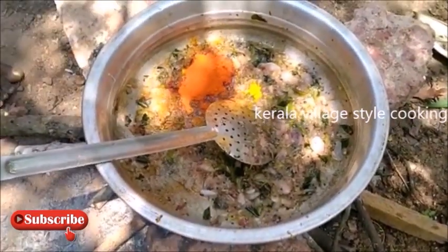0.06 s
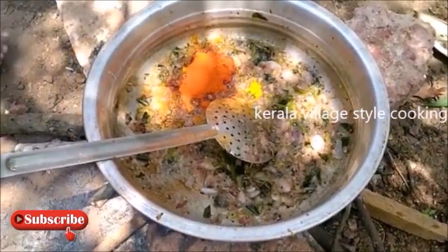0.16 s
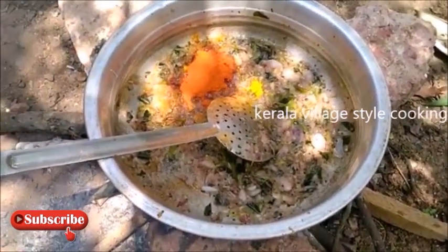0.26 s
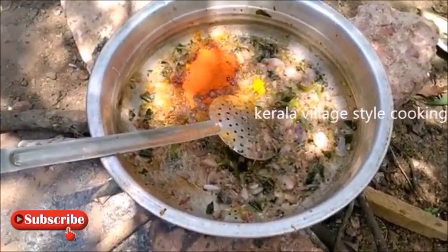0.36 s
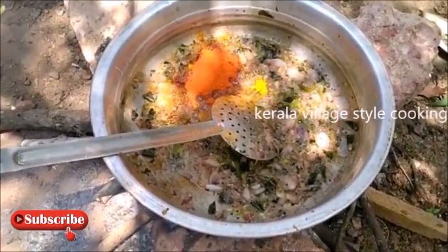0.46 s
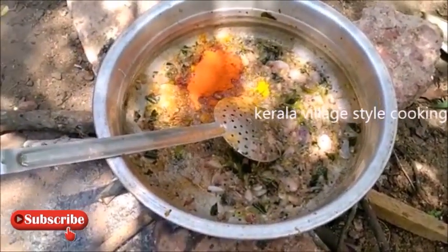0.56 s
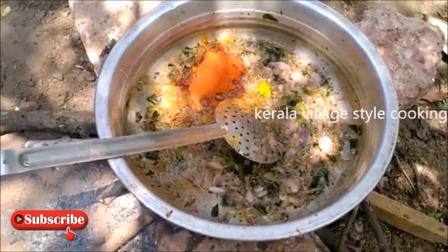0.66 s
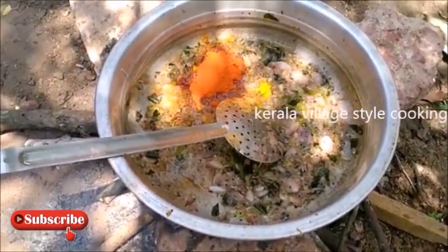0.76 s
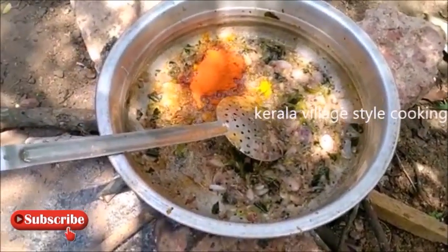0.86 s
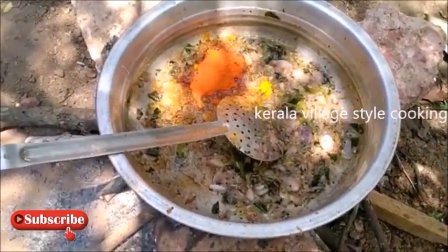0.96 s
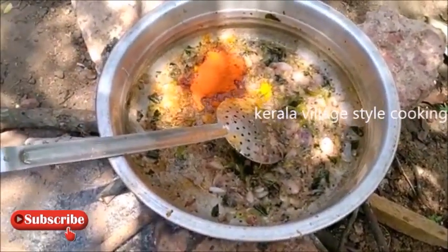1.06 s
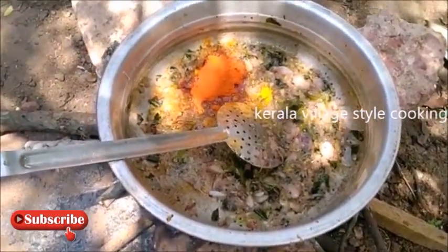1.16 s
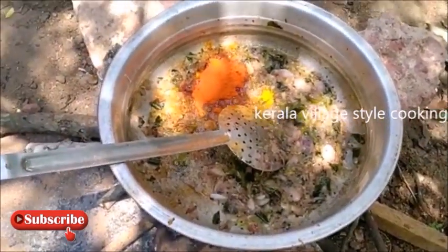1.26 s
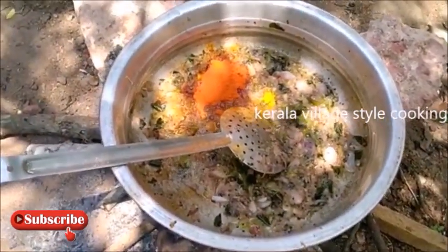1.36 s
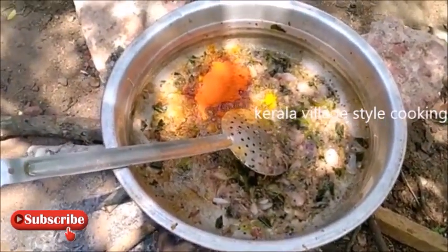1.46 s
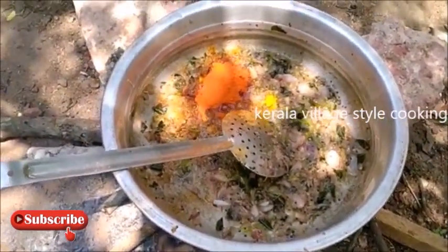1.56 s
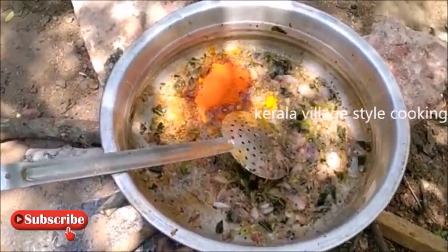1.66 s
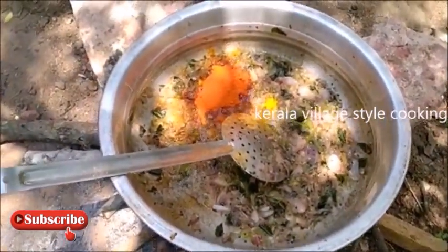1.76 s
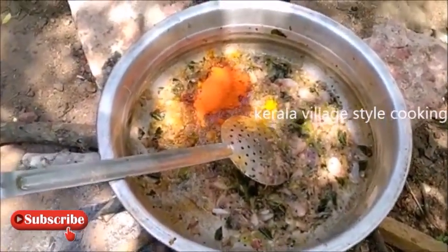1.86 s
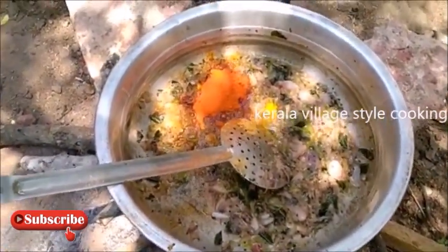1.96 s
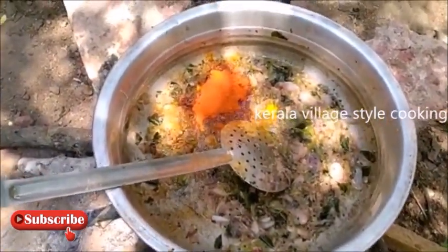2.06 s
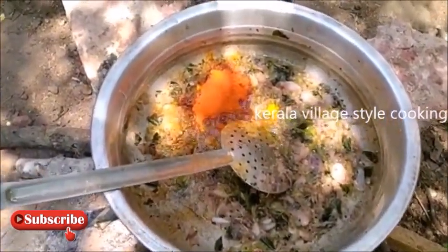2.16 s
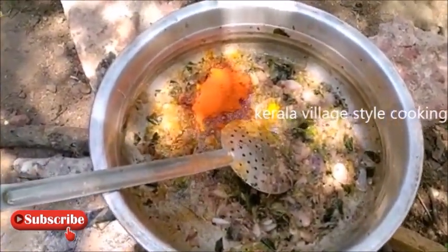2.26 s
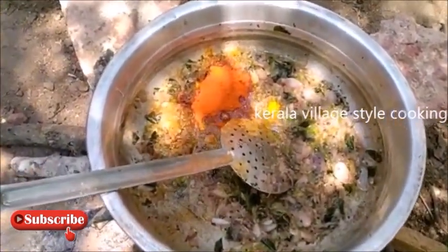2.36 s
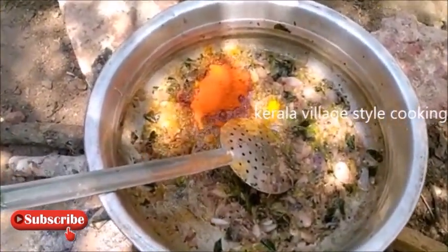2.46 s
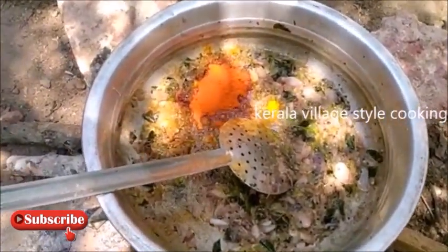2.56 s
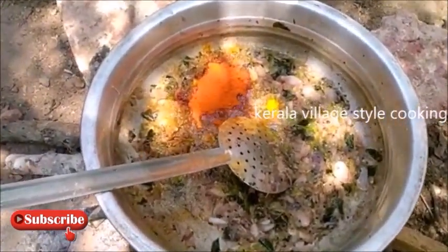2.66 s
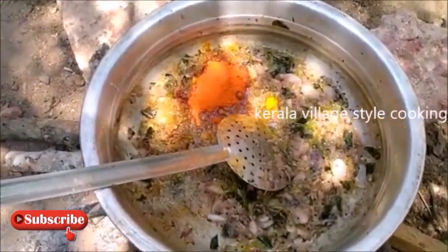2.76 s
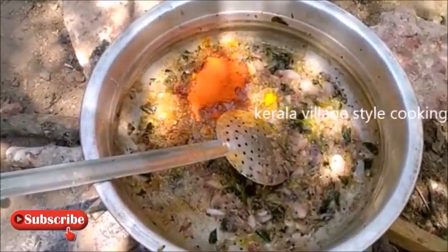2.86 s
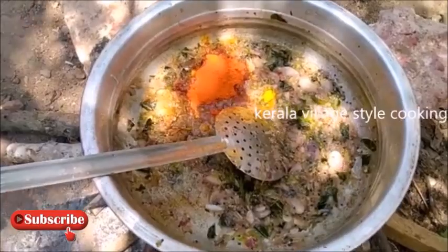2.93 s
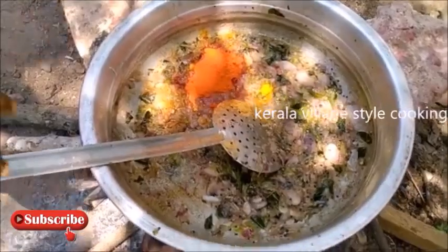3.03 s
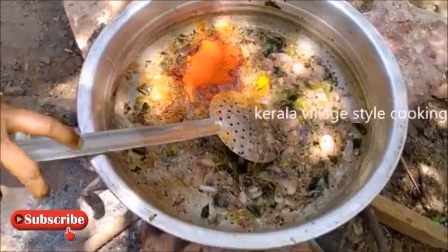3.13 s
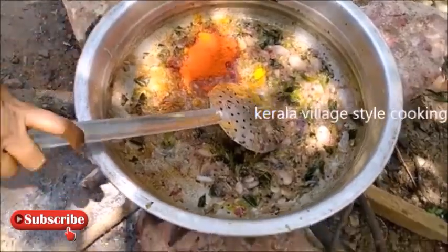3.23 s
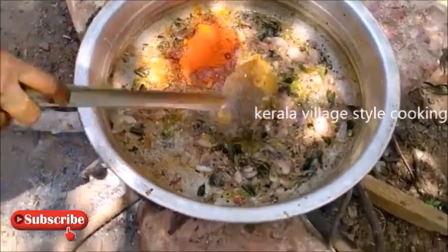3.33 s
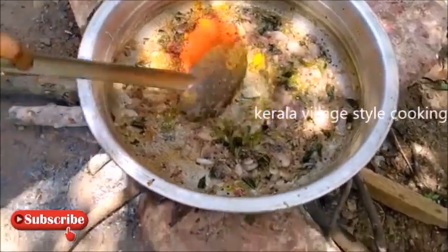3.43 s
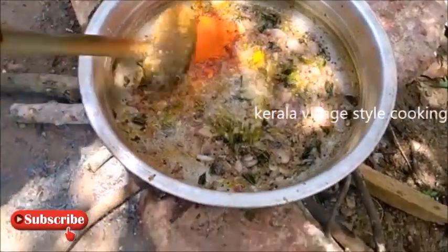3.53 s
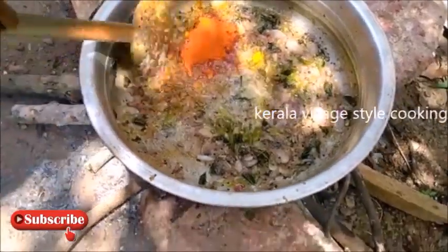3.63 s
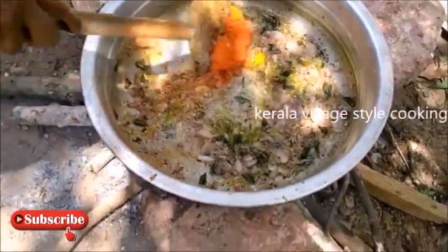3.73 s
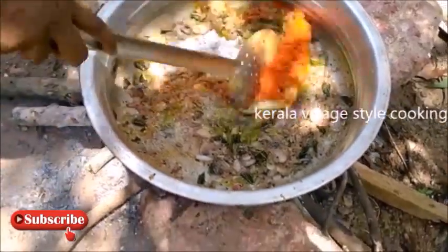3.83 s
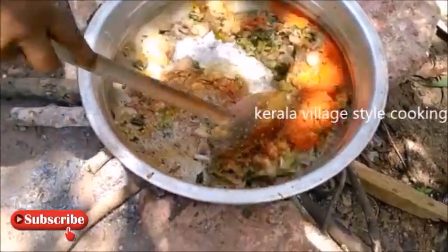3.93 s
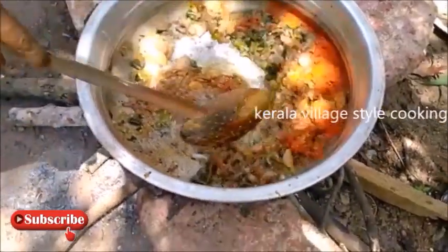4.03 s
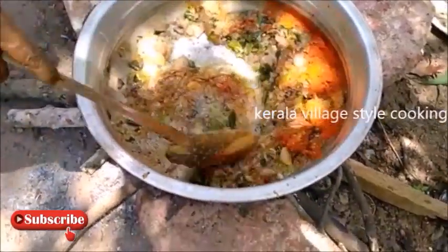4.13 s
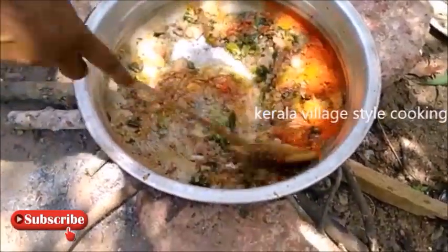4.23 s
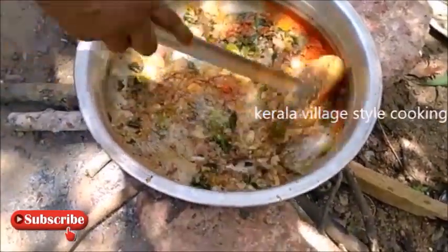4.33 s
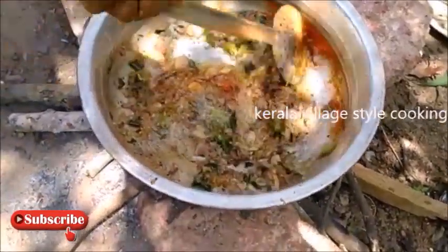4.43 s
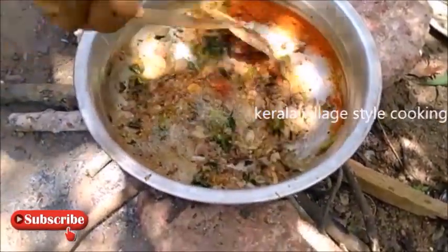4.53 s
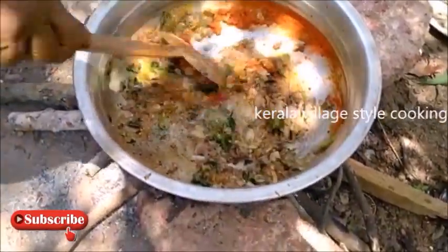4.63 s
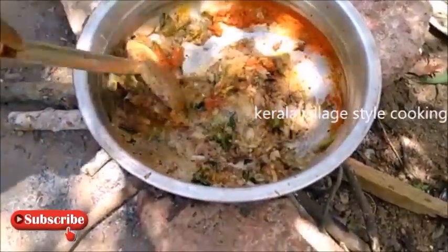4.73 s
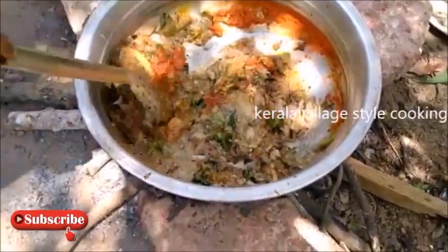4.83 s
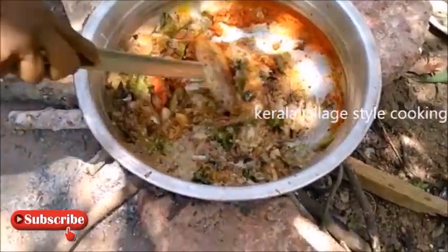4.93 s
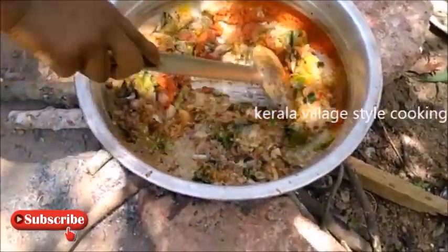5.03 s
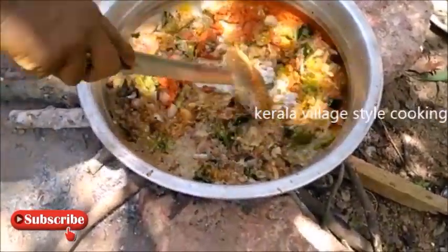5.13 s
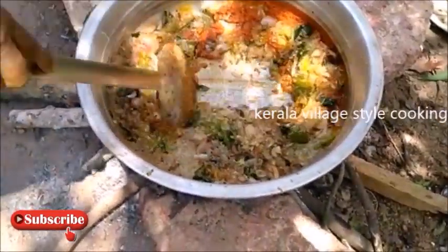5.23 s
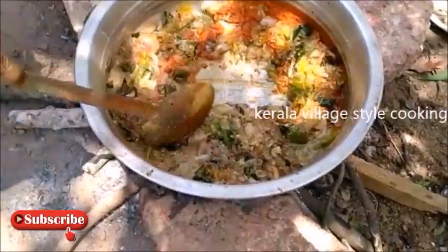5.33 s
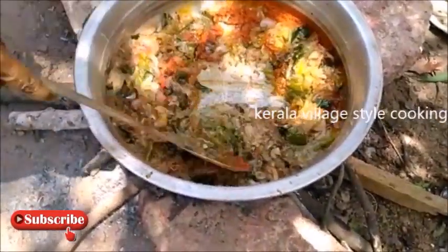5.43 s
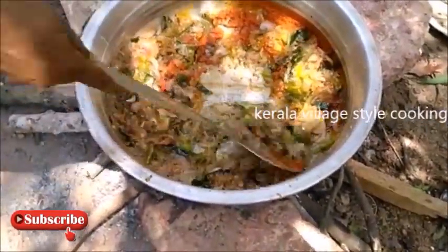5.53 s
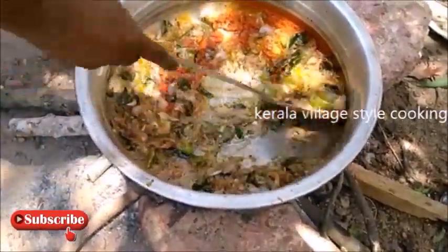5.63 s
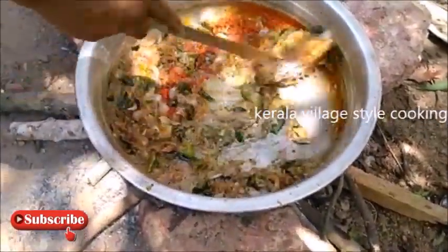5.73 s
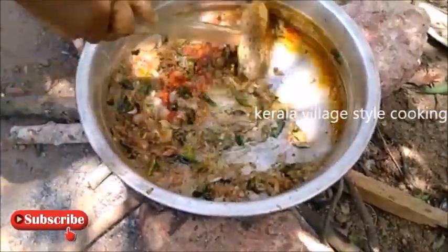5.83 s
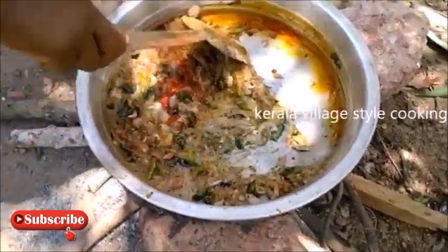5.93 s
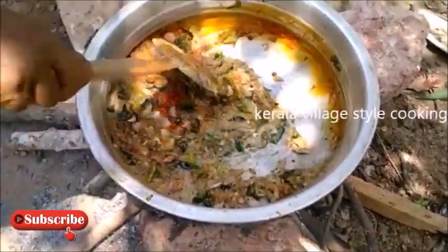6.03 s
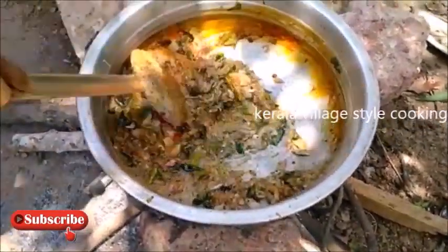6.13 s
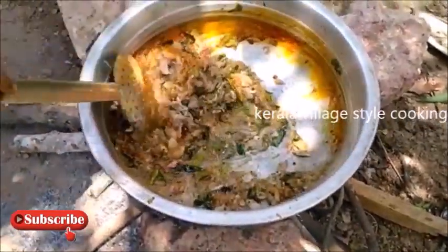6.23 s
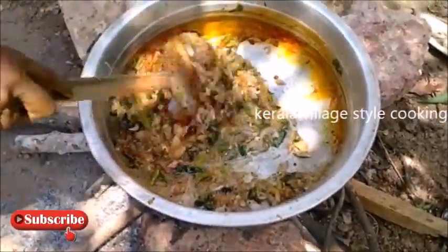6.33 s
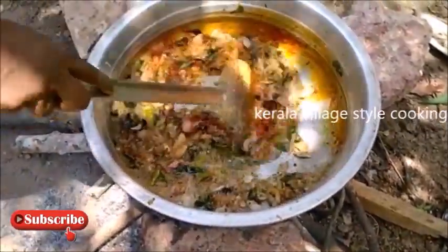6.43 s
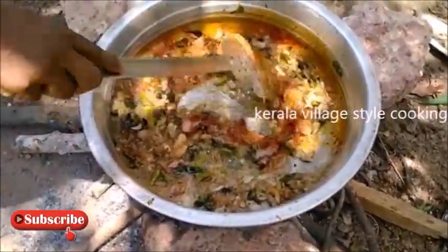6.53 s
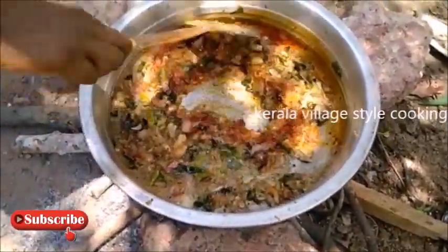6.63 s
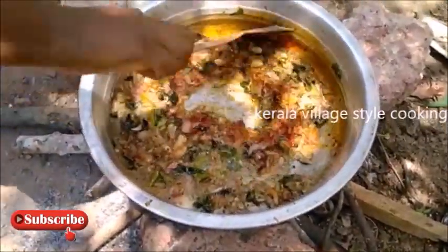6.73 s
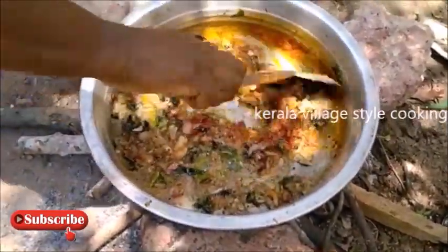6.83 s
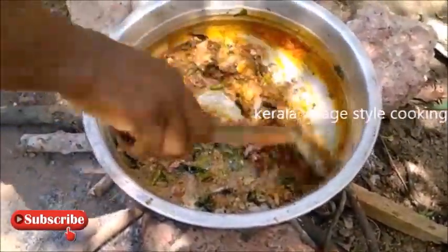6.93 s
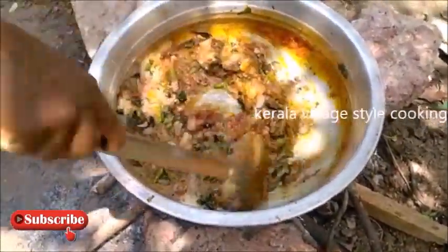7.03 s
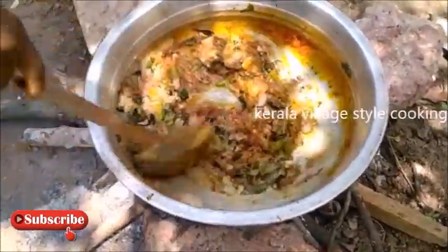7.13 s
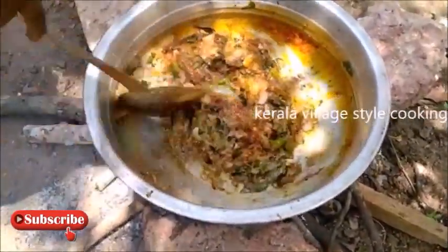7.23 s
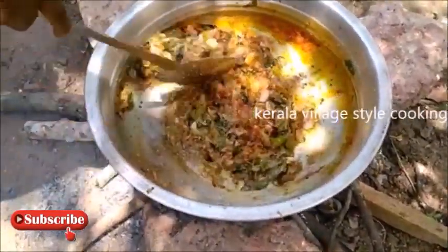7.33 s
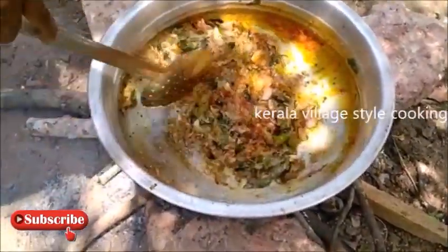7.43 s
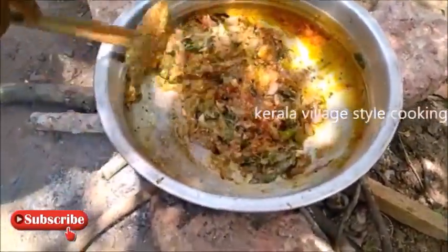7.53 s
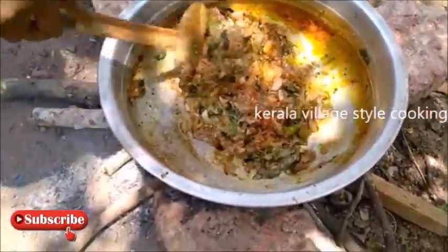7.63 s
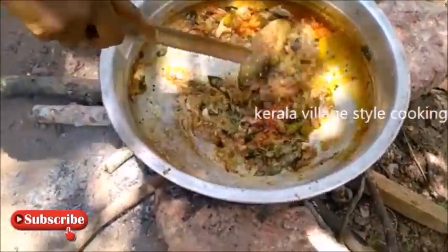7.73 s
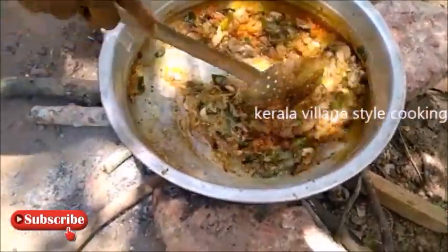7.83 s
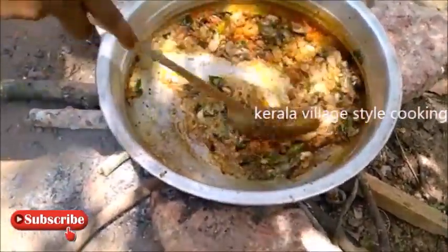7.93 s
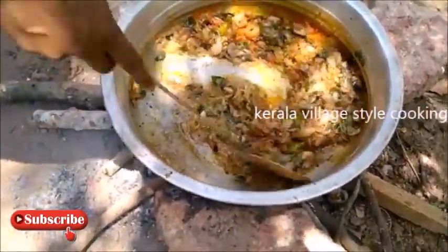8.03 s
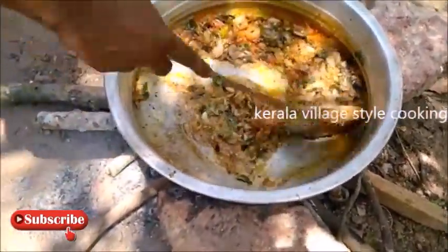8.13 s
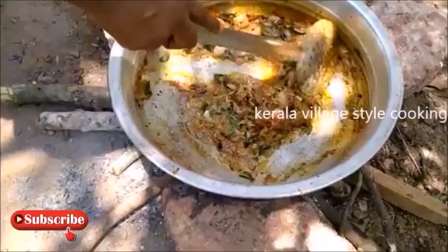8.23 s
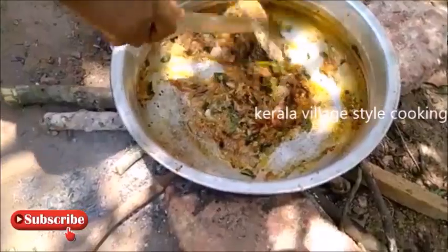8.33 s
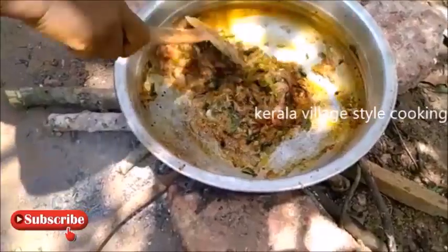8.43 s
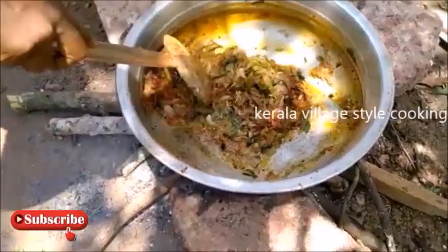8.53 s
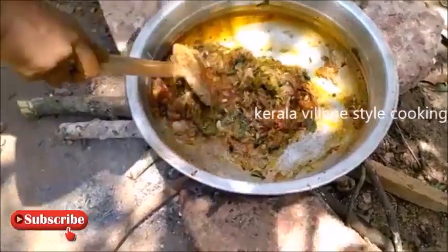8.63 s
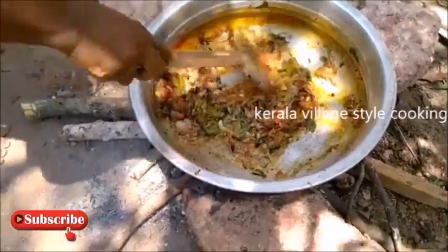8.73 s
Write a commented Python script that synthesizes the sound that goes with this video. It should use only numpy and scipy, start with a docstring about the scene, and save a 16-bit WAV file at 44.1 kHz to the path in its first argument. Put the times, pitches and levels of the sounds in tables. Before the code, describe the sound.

Soft frying outdoors with a tiny metal jingle, then dull pot knocks, bright steel scrapes and wet stirring pushes in uneven bursts.

```python
"""A steel ladle stirs a pot of onions and spices frying gently over an outdoor wood fire.
Stick-slip grains and landings ring its modes; damped swings make the knocks, wet grains the pushes.
Filtered random grains make the sizzle, and slowly wavering low noise the fire.
Early on, small metal jingles from chattering grains, and something shuffles nearby in soft bursts.
Far birds call in harmonics and breath noise through a throat resonance, with a blurred echo."""
import sys
import numpy as np
from scipy import signal
from scipy.fft import rfft, irfft
from scipy.io import wavfile

SR = 44100
rng = np.random.default_rng(int(sys.argv[2]) if len(sys.argv) > 2 else 0)


def output_pcm(signal):
    """Save a mono or channel-first signal as 16-bit PCM at the path in sys.argv[1].

    Samples are clipped to [-1, 1] before scaling.
    """
    pcm = np.clip(np.atleast_2d(signal).T, -1, 1) * 32767
    wavfile.write(sys.argv[1], SR, np.round(pcm).astype(np.int16))


N = 387198
TIME = np.arange(N) / SR

# Levels in the tables are relative: each source trims its own in the mix.
# steel dragged over the bare bottom: start_s, length_s, ring_db, grit_db, pot_drone_db
SCRAPE_STROKES = [(4.227, .16, -26, -32, -43), (5.601, 0.042, -29, -34, -37),
                  (5.676, 0.033, -27.5, -34, -36), (5.731, 0.098, -26, -33.5, -36),
                  (6.82, 0.077, -27.5, -33.5, -41), (6.914, 0.08, -27.5, -34, -30.5),
                  (7.005, 0.16, -20.5, -28.5, -32), (8.116, .21, -20.5, -30.5, -36)]
# ladle pushing through the food: start_s, length_s, squelch_db, pot_drone_db
PUSH_STROKES = [(3.629, 0.09, -44, -43), (3.688, .15, -36.5, -45.5), (4.144, 0.011, -39, -37.5),
                (4.18, 0.041, -54, -48), (4.833, 0.046, -36.5, -45), (4.894, 0.12, -35.5, -38),
                (5.04, .035, -45, -41.5), (5.075, .123, -38.5, -45.5), (6.274, 0.074, -41.5, -44.5),
                (6.33, 0.036, -33.5, -41), (6.666, 0.13, -40, -37.5), (7.551, 0.091, -34, -34),
                (7.636, 0.072, -32, -46), (8.029, 0.076, -40, -45), (8.628, 0.034, -43.5, -46),
                (8.666, 0.1, -35.5, -41)]
# ladle lands and skids: start_s, strike_db, skid_db, skid_time_constant_s
LADLE_LANDINGS = [(3.6, -29, -24.5, .014), (4.232, -27, -28, 0.032), (5.5863, -26, -21, 0.004),
                  (6.595, -17.5, -24.5, 0.017), (7.5317, -17, -15.5, 0.011), (7.9935, -19, -19, 0.0092),
                  (8.0128, -15, -25, 0.02)]
# dull blows on the loaded pot: start_s, level_db, pitch_hz
POT_KNOCKS = [(3.619, -25.5, 465), (3.696, -24.5, 446), (4.15, -29.5, 465), (4.236, -32, 495),
              (4.4812, -5.5, 460), (4.520, -30, 400), (4.814, -16.5, 425), (4.8905, -20.5, 368),
              (5.586, -23.5, 320), (5.700, -17, 405), (6.247, -31, 408), (6.271, -32, 430),
              (6.3417, -19.5, 386), (6.347, -35, 135), (6.674, -29.5, 507), (8.0068, -16.5, 460),
              (8.011, -28.5, 208), (8.0879, -26.5, 382), (8.2396, -14, 405), (8.699, -22, 343)]
# light taps of the ladle's edge and handle: start_s, level_db, pitch_hz
LADLE_TAPS = [(3.199, -33, 1940), (3.215, -31, 2180), (3.692, -35, 2100), (4.1485, -32, 1650),
              (4.4825, -17, 940), (4.8592, -22.5, 1660), (4.8905, -21, 2170), (6.3354, -19, 1510),
              (6.5945, -22.5, 880), (6.674, -35, 1050), (7.7197, -20, 1130), (7.8072, -27, 2700),
              (7.995, -20.5, 960)]
# small metal rattles: start_s, level_db, rattle_time_constant_s
JINGLE_RATTLES = [(.3045, -34, 0.017), (.329, -29, 0.014), (.4995, -35, 0.011), (.523, -30, 0.011),
                  (.5505, -19, 0.0053)]
# modes of the free ladle, before the hand's grip: pitch_hz, level_db, t60_s
LADLE_MODES = [(1255, -13, .3), (1960, -4, .15), (2137, -2, .17), (2174, -2, .24), (2320, 1, .15),
               (2374, -2, .19), (2422, -8, .17), (2495, -7, .14), (2588, -5, .17), (2687, -9, .15),
               (2966, -14, .17), (3200, -14, .13), (3381, -18, .11), (3677, -11, .13), (3828, -13, .11),
               (4011, -14, .1), (4054, -13, .12), (4097, -14, .12), (4344, -12, .11), (4450, -14, .09),
               (4705, -17, .11), (5012, -19, .09)]
# modes of the small metal: pitch_hz, level_db
SMALL_METAL_MODES = [(6718, -16), (8113, -12), (8600, -12), (10360, -11), (12540, -15), (13330, -13),
                     (13760, -12), (15060, -3), (15180, -3)]
# smooth noise colours, each: frequency_hz, density_db (relative, per Hz)
STEEL_COLOUR = [(300, -13), (700, -11), (1300, -10.5), (1700, -14), (2200, 0), (2700, -1.5), (3400, -11),
                (4300, -6.5), (5400, -20), (8000, -27)]
GRIT_COLOUR = [(3000, 9.5), (5000, -89), (5800, -14), (7000, 1), (8600, 8), (10000, 0), (11800, -4.5),
               (13500, 4.5), (15700, 4)]
DRONE_COLOUR = [(60, -38), (150, -12.5), (280, -15), (400, -2), (470, 4), (570, -3), (700, -20),
                (1200, -23), (3000, -66)]
SQUELCH_COLOUR = [(400, -17.5), (800, -1), (1300, 5), (2400, 1), (3300, -5), (5500, -19), (8500, -15),
                  (11500, -19), (15500, -6.5)]
SIZZLE_COLOUR = [(150, -1.5), (300, -2), (600, -2.5), (1000, -2), (1600, 0.5), (2400, 3.5), (3500, -2),
                 (5200, -12), (6500, -14.5), (8400, -7.5), (10000, -14.5), (12000, -14.5), (15500, -3.5)]
FIRE_COLOUR = [(20, 1.5), (45, -3.5), (90, -3), (120, -12.5), (200, -19)]
SHUFFLE_COLOUR = [(700, -10.5), (1200, -5), (1900, 3), (2500, 0.5), (3500, -8), (6000, -16.5), (10000, -18)]
# far birds, each call an arch of its fundamental: start_s, length_s, time_to_top_s, top_pitch_hz,
# rise_semitones, fall_semitones, level_db, hoarseness (0-1)
CALLS = [(0.428, .47, 0.171, 533, 1.8, 1.8, -47, 0.55), (1.33, .62, .16, 648, 3.2, 5.65, -48.5, 0.16),
         (2.479, 0.32, 0.14, 541.4, 2.4, 1.2, -44, 0.46), (3.272, .24, 0.14, 718, 5.5, 1.0, -43, 0.15),
         (5.68, 0.98, .38, 428.5, 1.35, 3.0, -47, 0.52)]
# resonance of the bird throat: frequency_hz, level_db
THROAT_COLOUR = [(300, -34), (550, -21), (820, -18), (1030, -3), (1300, 0), (1700, -1), (1980, -20),
                 (2800, -27), (5000, -50)]
# the loudest spits of wet food on hot metal: start_s, level_db
LOUD_SPITS = [(3.8514, -41), (4.134, -38), (5.4745, -47), (6.7706, -36), (6.7955, -40), (7.7658, -33),
              (7.779, -43), (7.8077, -33)]
# faint shuffling beside the pot: start_s, level_db, time_constant_s
SHUFFLE_BURSTS = [(0.105, -45, 0.031), (0.306, -37.5, 0.036), (0.396, -46.5, 0.025), (0.487, -46, 0.05),
                  (0.56, -42, 0.05), (1.14, -51, 0.37), (2.94, -48, 0.067), (3.19, -45.5, 0.051)]
# draught of the fire, joined by straight lines: time_s, level_db
FIRE_DRAUGHT = [(0.0, -65), (1.96, -61), (2.79, -64.5), (2.98, -64.5), (6.26, -68.5), (8.78, -59.5)]

# a scrape bites at once, swells at mid stroke and lets go; its grit sags over the stroke
SCRAPE_ATTACK_S, SCRAPE_RELEASE_S, SCRAPE_SWELL_DB, GRIT_SAG_DB = 0.0029, 0.023, 3.5, 1
# a push swells less, and the drone sinks as the food slides off the blade
PUSH_ATTACK_S, PUSH_RELEASE_S, PUSH_SWELL_DB, DRONE_SAG_DB = 0.0033, 0.018, 1.5, 1
SETTLE_FOLLOWS = 0.71  # dB of after-rattle for each dB of a blow
# each push lays wet food on hot metal: fine spitting flares up and dies down,
# less and less with later pushes as the food is coated in oil
FLARE_DB, FLARE_RISE_S, FLARE_FADE_S, COATING_DB_PER_S = -51.5, 0.085, 0.85, 4
# a call swells up to the top of its arch, then fades as its pitch falls
CALL_SWELL_DB, CALL_FADE_DB = 4.0, 11.0
CUTOFF_HZ = 15900


def amp(db):
    """Decibels to gain."""
    return 10 ** (np.asarray(db) / 20)


def rms_one(x):
    """Scale to unit rms."""
    return x / np.sqrt(np.mean(x ** 2) + 1e-20)


def energy_one(x):
    """Scale a response so that it passes white noise at the same level."""
    return x / np.sqrt(np.sum(x ** 2))


def through(x, response):
    """Play a signal through an impulse response."""
    return signal.oaconvolve(x, response)[:len(x)]


def body(spectrum, size=4096):
    """Causal (minimum-phase) impulse response of a smooth spectrum."""
    hz, db = np.transpose(spectrum)
    knots = np.log2(hz)
    octave = np.log2(np.maximum(np.fft.rfftfreq(size, 1 / SR), 1))
    # beyond the end points the spectrum falls 20 dB per octave
    outside = np.abs(octave - np.clip(octave, knots[0], knots[-1]))
    cepstrum = irfft(np.log(amp(np.interp(octave, knots, db) - 20 * outside)))
    # keeping only the first half of the cepstrum, doubled, makes the response causal
    return energy_one(irfft(np.exp(rfft(2 * cepstrum[:size // 2], size))))


def highpass(x, hz):
    """Second-order high-pass."""
    return signal.sosfilt(signal.butter(2, hz, "high", fs=SR, output="sos"), x)


def drift(rate):
    """Slow random wander of unit rms, with two knots per cycle of the rate in Hz."""
    knots = rng.standard_normal(int(TIME[-1] * rate * 2) + 2)
    return rms_one(np.interp(TIME * rate * 2, np.arange(len(knots)), knots))


def grains(per_s, spread_db):
    """Random tiny impacts of uneven size, rms 1."""
    sizes = amp(spread_db * np.minimum(rng.exponential(1, N), 4))
    signs = rng.choice([-1, 1], N)
    return rms_one(sizes * signs * (rng.random(N) < per_s / SR))


def bursts(rows):
    """Force of contacts (start, dB, time constant) that start sharply and die away."""
    force = np.zeros(N)
    for s, db, fade in rows:
        start = int(s * SR)
        t = TIME[:min(SR, N - start)]
        force[start:start + len(t)] += amp(db) * np.exp(-np.minimum(t / fade, 20))
    return force


def strokes(rows, attack_s, release_s, swell_db, sag_db):
    """Gain of strokes (start, length, dB): quick attack, a hold that arches and sags, a dying release."""
    gain = np.zeros(N)
    for s, length, db in rows:
        start = int(s * SR)
        t = TIME[:min(SR, N - start)]
        along = np.minimum(t / length, 1) - 0.5  # -0.5 at the start, 0.5 at the end
        hold = amp(db - swell_db * (2 * along) ** 2 - sag_db * along)
        release = np.exp(-np.clip((t - length) / release_s, 0, 20))
        gain[start:start + len(t)] += hold * np.minimum(t / attack_s, 1) * release
    return gain


def scraping(axis, sag_db=0.0):
    """Force of all scrapes, from one level column."""
    rows = [(row[0], row[1], row[axis]) for row in SCRAPE_STROKES]
    return strokes(rows, SCRAPE_ATTACK_S, SCRAPE_RELEASE_S, SCRAPE_SWELL_DB, sag_db)


def pushing(axis, sag_db=0.0):
    """Force of all pushes, from one level column."""
    rows = [(row[0], row[1], row[axis]) for row in PUSH_STROKES]
    return strokes(rows, PUSH_ATTACK_S, PUSH_RELEASE_S, PUSH_SWELL_DB, sag_db)


def tail(t60):
    """Countless close modes dying together, as fading noise."""
    t = TIME[:int(t60 * SR) + 2]
    return energy_one(rng.standard_normal(len(t)) * amp(-60 * t / t60))


def ringing(modes, t60):
    """Impulse response of a few clear modes, alternating in sign."""
    t = TIME[:SR // 2]
    tones = sum((-1) ** k * amp(db) * np.sin(2 * np.pi * hz * t) for k, (hz, db) in enumerate(modes))
    return energy_one(amp(-60 * t / t60) * tones)


def ring(force, hz, t60):
    """One mode as a two-pole resonator, passing white noise at its own level."""
    r, w = amp(-60 / (t60 * SR)), 2 * np.pi * hz / SR
    gain = np.sqrt(2 * (1 - r * r)) * np.sin(w)
    return signal.lfilter([gain], [1, -2 * r * np.cos(w), r * r], force + 1e-18)


def travelling(x, t60, rate):
    """Dense modes whose mix shifts as the contact point travels over the pot."""
    turn = 2 * np.pi * rate * TIME
    return through(x * np.cos(turn), tail(t60)) + through(x * np.sin(turn), tail(t60))


def flaring():
    """Gain of the fine spitting: the flares of all pushes add in power."""
    power = np.zeros(N)
    first_push_s = PUSH_STROKES[0][0]
    for s, *_ in PUSH_STROKES:
        age = np.maximum(TIME - s, 0)
        flare = (1 - np.exp(-age / FLARE_RISE_S)) * np.exp(-age / FLARE_FADE_S)
        power += (amp(FLARE_DB - COATING_DB_PER_S * (s - first_push_s)) * flare) ** 2
    return np.sqrt(power)


def frying(simmer_db=-52.0, fire_db=2.0, spit_hz=9000):
    """Countless steam bubbles burst in the oil; stirring wakes finer spitting; the fire flutters below."""
    sizzle = body(SIZZLE_COLOUR)
    simmer = through(grains(per_s=23000, spread_db=4.5), sizzle) * amp(1.07 * drift(3.5))
    spit = through(grains(per_s=6400, spread_db=3.0), sizzle)
    spit = rms_one(highpass(spit, spit_hz))
    flutter = through(rng.standard_normal(N), body(FIRE_COLOUR)) * amp(1.8 * drift(2.3))
    fire = flutter * amp(np.interp(TIME, *np.transpose(FIRE_DRAUGHT)))
    return amp(simmer_db) * simmer + spit * flaring() + amp(fire_db) * fire


def spitting(level_db=1.5, spit_s=0.0018, pops_per_s=4.0, pop_db=-47.0, pop_spread_db=3.5):
    """Single drops flash to steam as tiny noise bursts, a few loudly and many faintly."""
    born = rng.random(N) < pops_per_s / SR
    sizes_db = pop_db + pop_spread_db * rng.standard_normal(N)
    drops = [*LOUD_SPITS, *zip(TIME[born], sizes_db[born])]
    force = rng.standard_normal(N) * bursts([(s, db, spit_s) for s, db in drops])
    return amp(level_db) * through(force, body(GRIT_COLOUR))


def shuffling():
    """Something brushes and scuffs nearby: dense grains in soft, fading bursts."""
    friction = grains(per_s=6000, spread_db=-5.0) * bursts(SHUFFLE_BURSTS)
    return through(friction, body(SHUFFLE_COLOUR))


def jingle(level_db=-6.0, clatter_db=-10.0):
    """Small metal parts chatter against each other and ring briefly, very high."""
    chatter = grains(per_s=5600, spread_db=2.2) * bursts(JINGLE_RATTLES)
    chime = through(chatter, ringing(SMALL_METAL_MODES, t60=0.11))
    clatter = through(chatter, body(GRIT_COLOUR))
    clatter = clatter + through(clatter, tail(t60=0.54))
    return amp(level_db) * (chime + amp(clatter_db) * clatter)


def birds(level_db=-4.5, echo_db=-3.5, jitter=0.0106, waver_db=2.5, rasp=1.83):
    """Harmonic calls with a rasp of air through one throat resonance, blurred by the trees."""
    out, throat = np.zeros(N), body(THROAT_COLOUR)
    for s, length, top_s, top_hz, rise, fall, db, hoarse in CALLS:
        on = (TIME > s) & (TIME < s + length)
        t = TIME[on] - s
        before = np.maximum(1 - t / top_s, 0) ** 2
        after = np.maximum((t - top_s) / (length - top_s), 0) ** 2
        hz = top_hz * 2 ** (-(rise * before + fall * after) / 12)
        phase = 2 * np.pi * np.cumsum(hz * (1 + jitter * drift(40)[on])) / SR
        # clear calls are nearly all second harmonic; hoarse ones are richer
        others = 2 * np.sin(phase) + np.sin(3 * phase) + np.sin(4 * phase)
        voice = rms_one(through(np.sin(2 * phase) + 2 * hoarse * others, throat))
        air = rms_one(through(through(rng.standard_normal(on.sum()), throat), throat))
        swell_db = db - CALL_SWELL_DB * before - CALL_FADE_DB * after + waver_db * drift(13)[on]
        swell = amp(swell_db) * signal.windows.tukey(on.sum(), 0.2)
        out[on] += rms_one(voice + rasp * hoarse * air) * swell
    echo = through(out, tail(t60=0.6))
    return amp(level_db) * (out + amp(echo_db) * echo)


def blows(rows, cycles, crack_db, settle_db, settle_s, weight_db):
    """Each blow swings the pot for a cycle or two; a crack tops it, and the pot settles on its stones."""
    out, t = np.zeros(N), TIME[:SR // 4]
    for s, db, hz in rows:
        age = t * hz / cycles  # the swing's envelope peaks at age 1
        swing = np.sin(2 * np.pi * hz * t) * age ** 2 * np.exp(2 - 2 * age)
        white = rng.standard_normal((2, len(t)))
        crack = amp(crack_db) * white[0] * np.exp(-t / 0.002)
        colour = [(hz / 6, weight_db), (hz / 2, -3), (hz, 0), (2 * hz, -10), (8 * hz, -28)]
        settling = through(white[1], body(colour)) * np.exp(-t / settle_s)
        blow = amp(db) * (swing + crack) + amp(settle_db + SETTLE_FOLLOWS * db) * settling
        start = int(s * SR)
        out[start:start + len(t)] += blow[:N - start]
    return out


def taps():
    """Light blows of the ladle's edge and handle, higher pitched and quick to settle."""
    return blows(LADLE_TAPS, cycles=1.5, crack_db=-32.0,
                 settle_db=-20.5, settle_s=0.0098, weight_db=-20.0)


def ladle(modes_db=-10.0, grip=0.82, steel_db=-4.5, grit_db=-0.5, skid_grit_db=-10.5,
          strike_db=-8.0, strike_s=0.0032, tick_hz=11000, judder_db=2.5, wander_db=5.0):
    """Stick-slip and landings ring the ladle and the pot's dense modes; each landing ticks brightly."""
    slips = grains(per_s=5000, spread_db=1.5) * rms_one(amp(judder_db * drift(70)))
    strike = rng.standard_normal(N) * bursts([(s, db, strike_s) for s, db, _, _ in LADLE_LANDINGS])
    tick = highpass(strike, tick_hz)
    skid_force = bursts([(s, db, fade) for s, _, db, fade in LADLE_LANDINGS])
    skid = grains(per_s=7000, spread_db=1.4) * skid_force
    force = slips * scraping(axis=2) + skid + 0.5 * strike
    # as the blade turns, the same energy moves from mode to mode
    weights = amp(np.array(LADLE_MODES)[:, 1:2])
    shares = weights * np.array([amp(wander_db * np.tanh(drift(10))) for _ in LADLE_MODES])
    shares *= np.sqrt(np.sum(weights ** 2) / np.sum(shares ** 2, axis=0))
    # the hand's grip shortens the ring
    clear = sum((-1) ** k * ring(force * shares[k], hz, t60 * grip)
                for k, (hz, _, t60) in enumerate(LADLE_MODES))
    dense = through(force, body(STEEL_COLOUR))
    dense = 0.38 * dense + 1.07 * travelling(dense, t60=0.042, rate=2.0)
    grit_force = slips * scraping(axis=3, sag_db=GRIT_SAG_DB) + skid * amp(skid_grit_db)
    grit = through(grit_force, body(GRIT_COLOUR))
    grit = 0.4 * grit + 0.99 * travelling(grit, t60=0.043, rate=1.6)
    metal = amp(modes_db) * clear + amp(steel_db) * dense + amp(grit_db) * grit
    return metal + amp(strike_db) * strike + tick


def knocks():
    """Dull blows on the loaded pot, damped within about a cycle, with a heavier settling."""
    return blows(POT_KNOCKS, cycles=0.81, crack_db=-24.0,
                 settle_db=-20.5, settle_s=0.025, weight_db=-8.5)


def stirring(squelch_db=-2.5, push_db=-2.0, scrape_db=-5.5, clump_db=1.0):
    """Wet pieces crackle in clumps while the dragged ladle makes the damped bottom drone."""
    clumps = rms_one(amp(clump_db * drift(60)))
    crackle = grains(per_s=1400, spread_db=2.5) * clumps * pushing(axis=2)
    wet = through(crackle, body(SQUELCH_COLOUR))
    wet = 0.35 * wet + 0.82 * travelling(wet, t60=0.021, rate=6.0)
    drag = amp(push_db) * pushing(axis=3, sag_db=DRONE_SAG_DB) + amp(scrape_db) * scraping(axis=4)
    rub = grains(per_s=2500, spread_db=1.0) * np.sqrt(clumps) * drag
    drone = through(rub, body(DRONE_COLOUR))
    drone = 0.67 * drone + 0.5 * travelling(drone, t60=0.07, rate=2.8)
    return amp(squelch_db) * wet + drone


def scene():
    """All sources, heard from just above the pot, in one channel."""
    pot = taps() + ladle() + knocks() + stirring()
    surroundings = shuffling() + jingle() + birds()
    return (frying() + spitting() + surroundings + pot)[None]


def record(dry):
    """The top of the band is cut steeply."""
    lowpass = signal.ellip(10, 0.1, 70, CUTOFF_HZ, fs=SR, output="sos")
    return signal.sosfilt(lowpass, dry)


dry = scene()
out = record(dry)
output_pcm(out)
```